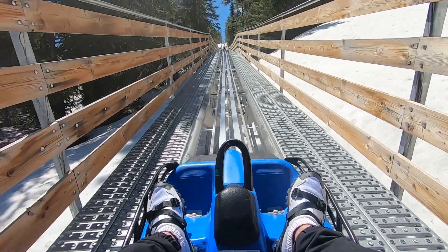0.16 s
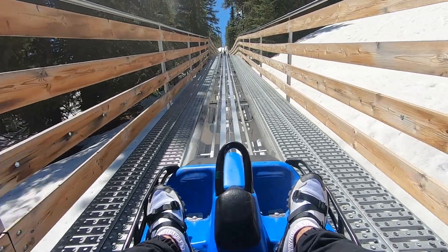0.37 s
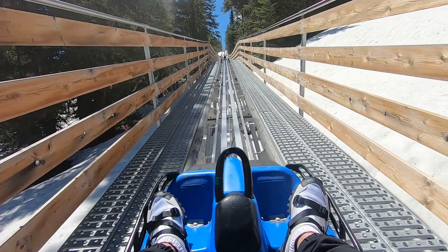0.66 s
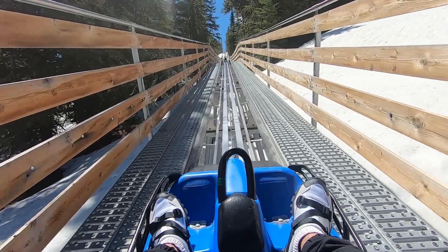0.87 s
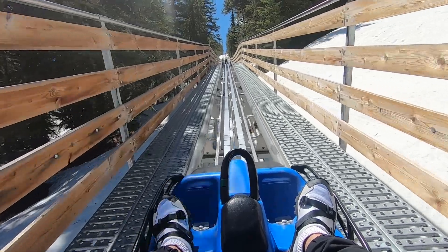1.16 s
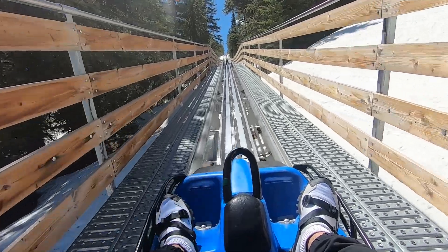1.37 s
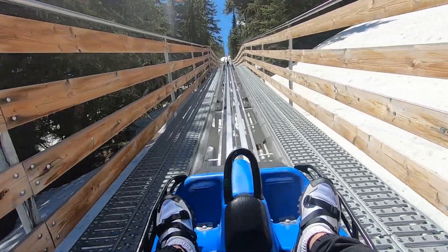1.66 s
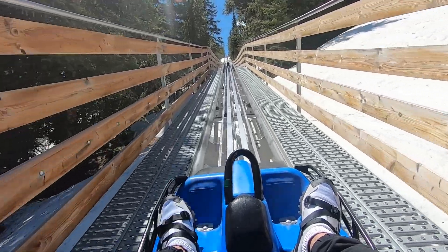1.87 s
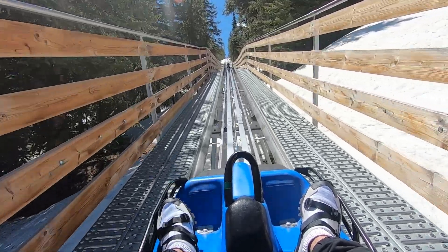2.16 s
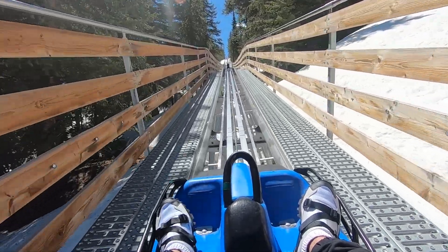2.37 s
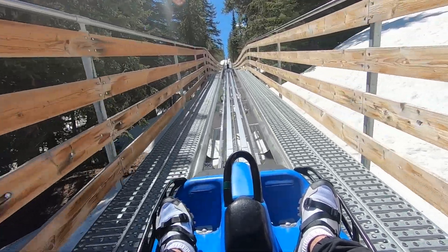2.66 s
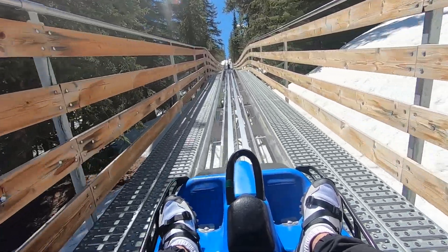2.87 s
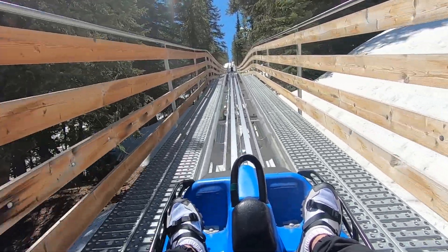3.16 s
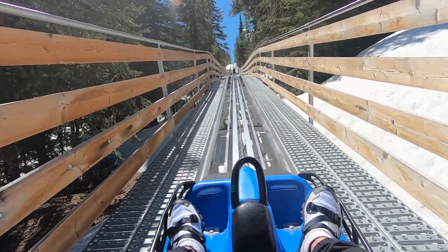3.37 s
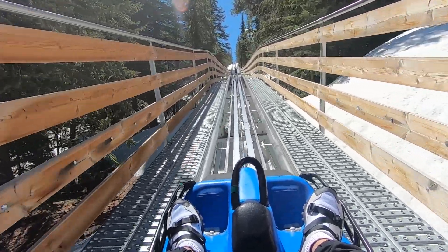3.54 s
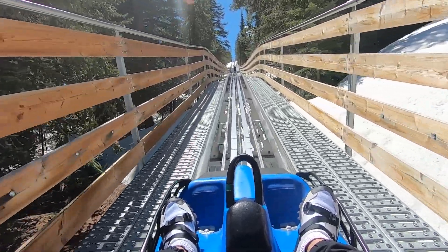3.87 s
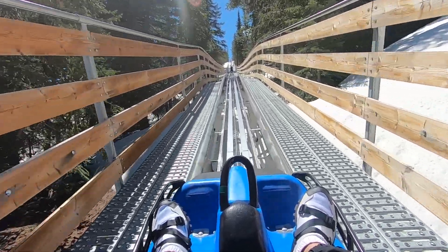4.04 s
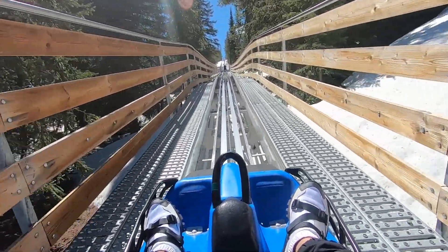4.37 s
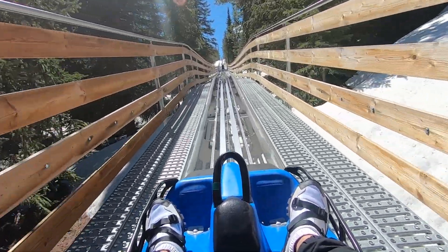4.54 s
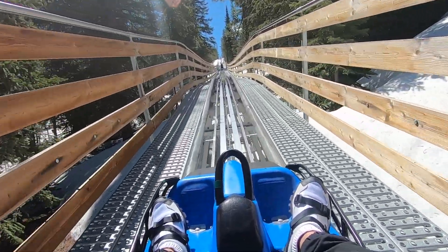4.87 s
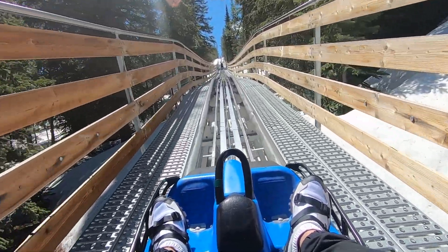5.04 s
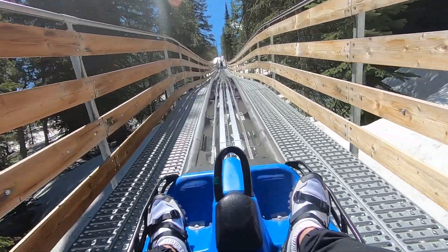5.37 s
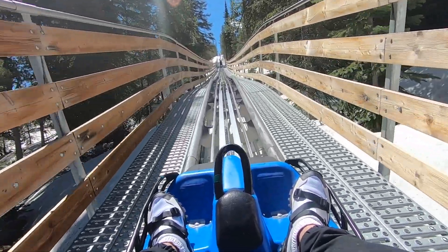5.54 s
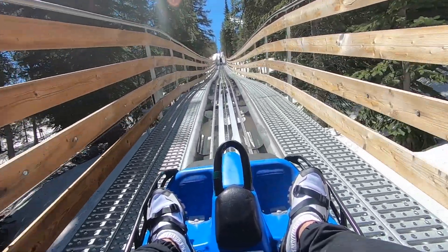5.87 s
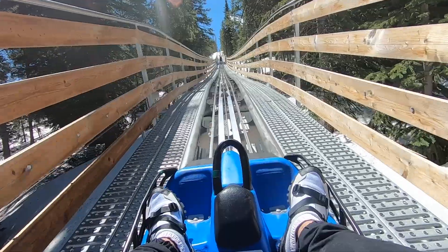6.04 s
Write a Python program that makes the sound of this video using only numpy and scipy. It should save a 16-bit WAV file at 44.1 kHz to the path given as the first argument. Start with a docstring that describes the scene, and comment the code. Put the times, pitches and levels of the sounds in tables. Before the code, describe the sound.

Close, rider-mounted listening on a rolling rail cart: steady low hum and muffled rumble with faint hiss and low buffeting. Front wheels thump over a joint, then rear wheels clack about half a second later, each shaking the cart body and setting the rails ringing. Weaker rebounds and dry ticks fill the gaps. Open air, no echoing room; narrow at first, wider later.

```python
"""Steel rails between wooden fences: a ride cart is towed along, heard from a camera on the rider.
The wheels roar and hiss as rolling noise, and hum as a drifting tone roughened by resonant noise.
At rail joints the front wheels thump, then the rear wheels clack: bursts of shaking ring the cart's
resonances, while filtered noise makes the track rattle and ring on. Loose parts tick as noise snaps.
The camera opens from mono to stereo halfway."""
import sys
import numpy as np
from scipy import signal
from scipy.fft import rfft, irfft, next_fast_len
from scipy.io import wavfile
from scipy.ndimage import uniform_filter1d

SR = 44100
rng = np.random.default_rng(int(sys.argv[2]) if len(sys.argv) > 2 else 0)


def log_audio(samples):
    """Write samples as a 16-bit WAV file to the path given in sys.argv[1]."""
    # one column per channel
    frames = np.atleast_2d(samples).T
    # limit to full scale, then quantise
    limited = np.clip(frames, -1, 1)
    pcm = np.round(limited * 32767).astype(np.int16)
    wavfile.write(sys.argv[1], SR, pcm)


N = 273772
LONG = next_fast_len(N, True)  # samples, a quick length for whole-scene transforms


def gain_of(db):
    """Decibels to gain."""
    return 10 ** (np.asarray(db) / 20)


def evened(x):
    """Scales to rms 1."""
    return x / np.sqrt(np.mean(x ** 2) + 1e-20)


def read(points, hz):
    """Reads a spectrum on a log-frequency axis."""
    f, value = np.transpose(points)
    return np.interp(np.log(hz + 1), np.log(f + 1), value)


def curve(rows, column):
    """One column of a table at every sample."""
    rows = np.array(rows)
    return np.interp(np.arange(N) / SR, rows[:, 0], rows[:, column])


def add(mix, s, sound):
    """Lays a sound into the mix at s seconds."""
    part = mix[:, round(s * SR):][:, :sound.shape[-1]]
    part += sound[..., :part.shape[-1]]


def coloured(x, points):
    """Shapes a sound by a spectrum."""
    hz = np.fft.rfftfreq(x.shape[-1], 1 / SR)
    return irfft(rfft(x) * gain_of(read(points, hz)), x.shape[-1])


def peak(hz, centre_hz, width):
    """The shape of a resonance over frequency, 1 at its top."""
    return 1 / (1 + (2 * (hz - centre_hz) / width) ** 2)


def resonate(x, hz, width):
    """A resonance of gain 1 that can follow a pitch curve: shift down to 0 Hz, smooth, shift back."""
    turn = np.exp(2j * np.pi * np.cumsum(hz * np.ones(x.shape[-1])) / SR)
    r = np.exp(-np.pi * width / SR)
    smooth = signal.lfilter([1 - r], [1, -r], x / turn + 1e-18)
    return 2 * (turn * smooth).real


def patchy(length, patchy_db, t60=None, hold_s=0):
    """Two unrelated noises with shared drifting patches; each band may die fast at first, then linger."""
    hz, t, z = signal.stft(rng.standard_normal((2, length)), SR, nperseg=256, noverlap=192)
    patches = uniform_filter1d(rng.standard_normal(z.shape[1:]), 4, 0)  # smooth over frequency
    patches = evened(uniform_filter1d(patches, 24, 1))  # then over time
    z = z * gain_of(patchy_db * patches)
    if t60:
        fall_db = -60 * np.maximum(t - hold_s, 0) / t60(hz)[:, None]
        fast, lingering = gain_of(1.41 * fall_db), gain_of(0.53 * fall_db - 9.0)
        z = z * np.hypot(fast, lingering)
    return signal.istft(z, SR, nperseg=256, noverlap=192)[1][:, :length]


# hiss of the microphone, spectrum shape: f/Hz, density/dB per Hz
MICROPHONE = [(2000, -24.5), (4000, 1.5), (5500, -2.5), (7000, -10.5), (10000, -17.5)]


def microphone_hiss(air):
    """The microphone's own steady noise, shaped from white noise."""
    level_db = -88
    return gain_of(level_db) * evened(coloured(air, MICROPHONE))[:, :N]


# rolling noise between blows: t/s, roar level/dB, grind level/dB, hiss level/dB, low buffeting level/dB
ROLL = [(0, -35.5, -55.5, -61.5, -41.5), (.24, -33, -59, -69, -48), (.53, -33, -61.5, -75, -32.5),
        (.9, -37.5, -60, -75, -45.5), (1.38, -34.5, -59.5, -71, -40), (1.65, -38.5, -63, -70, -51),
        (1.95, -37.5, -63.5, -70, -45), (2.5, -34.5, -56, -72, -44), (2.9, -35.5, -56.5, -64, -42.5),
        (3.23, -36.5, -60, -66.5, -40), (3.6, -33.5, -54, -73, -45), (3.92, -38, -55, -67.5, -41),
        (4.1, -38.5, -53.5, -66.5, -43.5), (4.35, -39.5, -66.5, -73, -40.5), (4.65, -39, -64, -71, -42),
        (4.86, -36.5, -58, -77, -45.5), (5.2, -39, -62, -66.5, -43.5), (5.62, -38.5, -62, -73, -42),
        (5.95, -39.5, -63.5, -73, -46.5), (6.21, -31.5, -57, -70, -47.5)]
# spectrum shapes of those four layers, each: f/Hz, density/dB per Hz
ROAR = [(59, -56.5), (100, -39), (139, -18), (153, -5), (177, -0.5), (204, -25.5), (343, -29.5),
        (427, -40.5), (644, -37.5), (709, -43), (763, -42), (937, -41.5), (1800, -60.5), (2340, -85.5),
        (3960, -120)]
GRIND = [(1000, -25.5), (1500, 4.5), (2100, 0.5), (2600, -1), (3200, -3.5), (4100, -11.5), (4800, -13.5),
         (6000, -39.5)]
HISS = [(2500, -28), (4000, 8.5), (5200, -2.5), (6600, -3.5), (8000, -4), (9500, -13), (11000, -17.5)]
BUFFET = [(15, -6), (30, 15.5), (50, 16.5), (80, 10.5), (130, 9.5), (200, -55)]
# rail singing: f/Hz, width/Hz, level/dB
WHINES = [(624, 60, -59), (2130, 80, -73), (4080, 120, -80), (6580, 200, -88)]


def rolling():
    """Wheels on steel: noise shaped into roar, grind, hiss and low buffeting, with faint rail lines."""
    roar = coloured(patchy(LONG, patchy_db=2.5), ROAR)
    roar = coloured(roar, [(150, -4.5), (175, -21.5), (210, 2.5)])  # a gap at the pitch of the hum
    steel = patchy(LONG, patchy_db=0.0)
    hz = np.fft.rfftfreq(LONG, 1 / SR)
    singing = sum(gain_of(db) / np.sqrt(w) * peak(hz, f, w) for f, w, db in WHINES)
    lines = irfft(rfft(steel) * singing * np.sqrt(SR / np.pi * 2), LONG)[:, :N]
    air = rng.standard_normal((2, LONG))
    layers = roar, coloured(steel, GRIND), coloured(air, HISS), coloured(air, BUFFET)
    wheels = sum(gain_of(curve(ROLL, k + 1)) * evened(layer[:, :N])
                 for k, layer in enumerate(layers))
    return lines + microphone_hiss(air[::-1]) + wheels


# wheel hum between blows: t/s, level/dB
HUM = [(0, -39), (.19, -25.5), (.27, -34), (.41, -25.5), (.5, -33.5), (.7, -26), (.92, -31), (1.1, -25.5),
       (1.3, -24.5), (1.43, -28), (1.52, -32.5), (1.62, -31), (1.71, -22.5), (1.75, -25.5), (1.79, -39.5),
       (1.9, -39), (1.95, -30), (2.14, -29), (2.25, -29.5), (2.4, -26.5), (2.56, -27), (2.66, -35),
       (2.78, -23.5), (3.1, -32), (3.3, -29), (3.47, -40), (3.56, -32), (3.7, -35.5), (3.84, -28.5),
       (4.13, -30), (4.24, -34), (4.4, -27), (4.6, -36.5), (4.8, -38.5), (5.05, -42.5), (5.3, -39.5),
       (5.52, -35.5), (5.7, -31.5), (6.03, -32.5), (6.14, -22), (6.21, -53)]
# drift of the hum: t/s, f/Hz
HUM_PITCH = [(0, 176.4), (.45, 174), (.65, 177.8), (.85, 173.5), (1.3, 176), (1.75, 172), (2.2, 174.7),
             (3.1, 175.3), (3.9, 175.8), (4.5, 174.1), (5.2, 176.4), (5.9, 173.9), (6.21, 175)]
HUM_ROUGH, JOLT_FADE_S = 0.33, 0.015  # rough part relative to the tone; fade of a swell in and out, s


def hum():
    """A steady tone, roughened by rail noise ringing in the same resonance, swelling while a blow shakes the tub."""
    t, hz = np.arange(N) / SR, curve(HUM_PITCH, 1)
    tone = np.sqrt(2) * np.sin(2 * np.pi * np.cumsum(hz) / SR)
    rough = evened(resonate(resonate(rng.standard_normal(N), hz, 50), hz, 64))
    level = gain_of(curve(HUM, 1))
    for s, _, rattle_s, *_, swell_db in JOINTS:
        fade_in = np.clip((t - s) / JOLT_FADE_S, 0, 1)
        fade_out = np.exp(-np.maximum(t - s - rattle_s, 0) / JOLT_FADE_S)
        level = np.maximum(level, gain_of(swell_db) * fade_in * fade_out)
    return level * (tone + HUM_ROUGH * rough)


# loose parts ticking: t/s, starting level/dB, f/Hz, width of each of two resonances/Hz, t60/s
TICKS = [(0.284, -43, 1000, 900, 0.018), (0.7333, -63, 5970, 4000, .02), (1.333, -59.5, 5400, 3000, .1),
         (2.26, -66, 7500, 2970, .08), (2.409, -57, 8500, 2000, 0.018), (2.55, -51, 2920, 800, .06),
         (2.628, -48.5, 2720, 700, 0.14), (2.63, -43, 1860, 505, 0.16), (2.86, -53, 4800, 1471, .04),
         (3.526, -44.5, 3700, 1000, .04), (3.6022, -55, 4000, 1940, .02), (3.7574, -58, 8500, 2470, .02),
         (3.8414, -65, 7800, 2530, .04), (3.9433, -58, 7000, 4060, .015), (3.963, -47, 4060, 302, .05),
         (3.9874, -59, 6500, 4000, .015), (4.0243, -53, 4130, 200, 0.078), (4.845, -67, 6470, 2980, 0.11),
         (4.92, -69, 7240, 806, 0.14), (5.06, -43, 900, 800, 0.018), (5.119, -42, 7800, 3000, 0.082),
         (5.24, -57, 7400, 4000, .3), (5.4874, -55, 5500, 4000, .015), (5.5044, -55, 4500, 2510, .015),
         (5.57, -63, 8600, 1506, .02)]


def tick(start_db, hz, width, t60):
    """A loose part: a short snap of noise round a pitch, dying exponentially."""
    t = np.arange(SR // 5) / SR
    snap = resonate(resonate(rng.standard_normal((2, len(t))), hz, width), hz, width)
    return gain_of(start_db - 60 * t / max(t60, .004)) * evened(snap)


# clatter of the track, spectrum shape: f/Hz, density/dB per Hz
CLATTER = [(250, -27.5), (430, 0.5), (789, -4.5), (877, -9), (1240, -6), (1390, -5), (1550, -4.5),
           (2520, -16.5), (3000, -17.5), (3330, -22.5), (3950, -22.5), (7860, -47.5), (10100, -62),
           (13100, -85.5), (22000, -120)]
# rail modes: f/Hz, width/Hz, lift/dB before chance scales it
RINGS = [(577, 48, 6.5), (652.4, 17, 8.5), (715, 60, 3), (792, 25, 3.5), (931, 100, 6.5), (1064, 8.5, 9),
         (1144, 16, 7), (1264, 29, 6), (1630, 9.7, 5), (1753, 40, 5.5), (1980, 74, 8), (2102, 10, 3.5),
         (2323, 41, 7.5), (2750, 22, 3.5), (2900, 90, 4), (3630, 71, 6), (3870, 88, 0.5), (3690, 81, 3.5),
         (4020, 75, 8.5), (4853, 36, 0.5), (7020, 240, 9), (8750, 120, 12)]


def rail_ring(clatter, best_hz, best_db):
    """Rail modes stand out of the clatter, each by chance more or less, one lifted further."""
    hz = np.fft.rfftfreq(clatter.shape[-1], 1 / SR)
    chances = rng.uniform(0.8, 1.3, len(RINGS))
    modes_db = sum(db * chance * peak(hz, f, w) for (f, w, db), chance in zip(RINGS, chances))
    best_mode_db = best_db * peak(hz, best_hz, 0.044 * best_hz)
    return irfft(rfft(clatter) * gain_of(read(CLATTER, hz) + modes_db + best_mode_db))


def shaken(shakes, modes, db):
    """A part of the cart rings in its modes while it is shaken; db sets its first 50 ms."""
    ring = sum(gain_of(lift_db) * resonate(resonate(shakes, hz, w), hz, 3 * w) for hz, w, lift_db in modes)
    return gain_of(db) * ring / ring[:SR // 20].std()


# edges of the bands in which a blow is levelled: f/Hz
TRACK_HZ = [450, 800, 1300, 2200, 3500, 5500, 10000]
# how every blow shares out over those bands: level/dB
TRACK_DB = [-1.2, -0.1, -1.96, -7, -16.5, -25.5]
TREBLE_HZ = 3500


def levelled(track, track_db, bright_db, treble_db):
    """Sets the first 50 ms of each band to the shared shape, tilted by the blow's brightness."""
    start = track[0, :SR // 20]
    power = np.cumsum(2 * abs(rfft(start)) ** 2 / len(start) ** 2)
    band_power = np.diff(power[np.array(TRACK_HZ) // 20])  # 50 ms gives bins of 20 Hz
    centres = np.sqrt(np.multiply(TRACK_HZ[1:], TRACK_HZ[:-1]))
    tilt_db = bright_db * np.log2(centres / centres[0]) + treble_db * (centres > TREBLE_HZ)
    bands_db = track_db + np.array(TRACK_DB) + tilt_db
    return coloured(track, list(zip(centres, bands_db - 10 * np.log10(band_power))))


# wheels over joints and their rebounds: t/s, rise/s, rattle/s, ring-on factor, best-rung rail mode f/Hz,
# its extra lift/dB, tub level/dB, frame level/dB, track level/dB, brightness/dB per octave,
# treble/dB, thud level/dB, level of the swollen hum/dB
JOINTS = [(0.282, 0.004, 0.033, 0.31, 620, 11, -54, -59, -51, -13, 4, -54, -60),
          (0.617, 0.0098, 0.051, 0.81, 2328, 2, -16, -38, -32.5, 0.16, -1.1, -30, -23.5),
          (0.765, 0.038, 0.033, 0.84, 693, 5.5, -55, -55, -38, -10, 7, -51, -60),
          (1.036, 0.004, 0.061, 0.95, 3024, 9.5, -31, -25.5, -29.5, 0.18, -1.2, -59, -24.5),
          (1.17, 0.036, 0.04, 0.86, 660, 7.5, -47.5, -62, -39.5, -9, 2, -45.5, -60),
          (1.985, 0.0085, 0.053, 0.68, 1833, 9.5, -16.5, -42.5, -29.5, 1.5, -7.5, -28, -15.5),
          (2.405, 0.004, 0.059, 0.99, 2900, 8.5, -33.5, -32.5, -34.5, -2.5, 4.5, -54, -30),
          (3.339, 0.004, 0.041, 0.79, 1596, 9.5, -16, -40, -28.5, 0.13, -2.3, -30.5, -23),
          (3.44, 0.03, 0.038, 0.99, 604, -4, -39, -40, -34, -6.5, .1, -50, -57),
          (3.56, 0.03, 0.04, 0.8, 1100, 6, -44, -55, -43, -3, -2.5, -49, -60),
          (3.751, 0.0022, 0.044, 0.99, 1569, 4.5, -32, -28.5, -31.5, -3.5, 2, -47, -30.5),
          (3.895, 0.004, 0.043, 0.65, 562, 17.5, -53, -64, -33.5, -4, 4, -48, -60),
          (3.963, 0.0039, 0.028, 0.89, 580, 11, -57, -47.5, -38.5, -4, -1.5, -61, -60),
          (4.052, 0.0041, 0.039, 0.8, 750, 5, -45.5, -71.5, -42, -6, -2, -39.5, -60),
          (4.702, 0.0013, 0.045, 0.9, 2170, 10, -20.5, -38, -29, -0.15, 3, -26.5, -18.5),
          (4.82, 0.03, 0.037, 0.98, 673, 7.5, -44, -57, -42.5, -5.5, 3, -50, -60),
          (5.059, 0.0041, 0.044, 0.73, 630, 13, -61, -61, -49.5, -9, 7, -50, -42),
          (5.114, 0.0017, 0.045, 1, 630.3, 5, -28.5, -27, -26.5, -0.63, 6.5, -46, -30.5),
          (6.063, 0.0019, 0.044, 0.84, 2180, 11.5, -21.5, -44, -31, 2.5, -2.5, -30.5, -20)]
# ring-on of the track: f/Hz, nominal t60/s before the ring-on factor
RING_ON = [(300, 0.38), (600, 1), (1400, 0.82), (2200, 0.69), (3000, 0.68), (4200, 0.54), (7000, 0.34),
           (10000, 0.78)]
# cart body under a blow: f/Hz, width/Hz, lift/dB
TUB = [(172.7, 6.3, -7.5), (127.5, 24, -5.5), (223, 16, 0.5), (270, 56, 6), (317, 35, 2.5)]
FRAME = [(378, 39, 0)]  # f/Hz, width/Hz, lift/dB
THUD = [(92, 56, 0)]  # f/Hz, width/Hz, lift/dB
HOLD_SHARE = 0.6  # share of the rattle for which the clatter does not yet die


def joint(rise_s, rattle_s, ring_on, best_hz, best_db, tub_db, frame_db, track_db, bright_db, treble_db, thud_db):
    """The cart rattles for a moment, shaking its body and the rail; the track clatters and rings on."""
    length, brief = 32768, 8192  # samples of track sound and of shaking
    ring_on = max(ring_on, .2)
    t = np.arange(length) / SR
    rise = 1 - np.exp(-t / max(rise_s, .001))
    rattle = np.exp(-np.maximum(t - rattle_s, 0) / 0.01)

    shakes = rattle * (1 - 0.36 * np.exp(-t / 0.017)) * rng.standard_normal(length)
    shakes = shakes * rng.exponential(1, length // 128).repeat(128) ** 0.24  # uneven from moment to moment
    shakes = shakes[:brief] + 1.34 * np.exp(-t[:brief] / 0.00038)  # the first blow is a hard push

    clatter = patchy(length, 1.4, lambda hz: read(RING_ON, hz) * ring_on, HOLD_SHARE * rattle_s)
    clatter = rail_ring(clatter, best_hz, best_db)
    grains = rng.exponential(1, length // 128).repeat(128) ** 0.12
    grains = uniform_filter1d(grains, 64)  # loose metal knocks in grains
    track = clatter * (1 + 0.31 * rattle) * rise * grains  # louder while the cart still rattles
    track = levelled(track, track_db, bright_db, treble_db)
    sound = track * np.minimum(t / 0.00071, 1) * np.cos(np.pi / 2 * t / t[-1])

    body = shaken(shakes, TUB, tub_db) + shaken(shakes, THUD, thud_db) + shaken(shakes, FRAME, frame_db)
    add(sound[:1], 0, body)  # the body sounds in the middle only
    return sound


# side signal in stereo: f/Hz, side gain/dB
WIDE = [(60, -3.5), (89, -7.5), (130, -20), (190, -31), (290, -28), (420, -17), (630, -10.5), (930, -4.5),
        (1370, -5), (2020, -4), (2990, -6), (4420, -8), (6530, 5), (9650, 0)]
# likeness of side to mid: f/Hz, correlation from -1 to 1
LEAN = [(100, 0.05), (700, -.15), (2000, -.2), (5000, -.3), (9000, -.5)]


def ports(near, apart):
    """Two microphone ports: the side signal is partly the middle, partly sound that reaches them apart."""
    hz = np.fft.rfftfreq(LONG, 1 / SR)
    lean = np.clip(read(LEAN, hz), -1, 1)
    blend = lean * rfft(near, LONG) + np.sqrt(1 - lean ** 2) * rfft(apart, LONG)
    side = irfft(gain_of(read(WIDE, hz)) * blend, LONG)[:N]
    return np.array([near + side, near - side])


def scene():
    """All sources at the two ports of the camera on the rider."""
    pair = rolling()  # middle sound, and sound that reaches the ports apart
    pair[0] += hum()
    for s, *snap in TICKS:
        add(pair, s, tick(*snap))
    for s, *blow, _ in JOINTS:
        add(pair, s, joint(*blow))
    return ports(*pair)


# opening of the stereo: t/s, side gain/dB
STEREO = [(0, -70), (3.39, -67.5), (3.42, -26), (3.7, -6.5), (4.3, -0.7), (6.21, 3)]
EDGE_HZ = 10250  # upper band limit


def record(dry):
    """The camera first blends its ports to mono, later lets them apart; then the band limit."""
    mid = dry.mean(0)
    side = (dry[0] - dry[1]) / 2 * gain_of(curve(STEREO, 1))
    pair = np.array([mid + side, mid - side])
    lowpass = signal.firwin(255, EDGE_HZ, window=("kaiser", 8), fs=SR)
    return signal.oaconvolve(pair, lowpass[None], "same")


dry = scene()
out = record(dry)
log_audio(out)
```